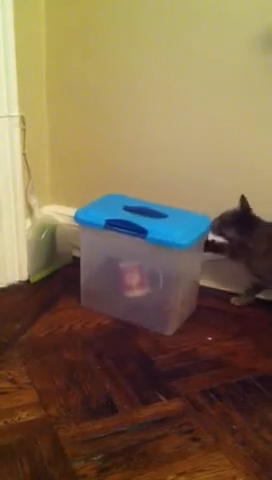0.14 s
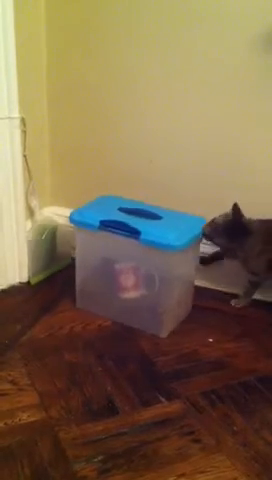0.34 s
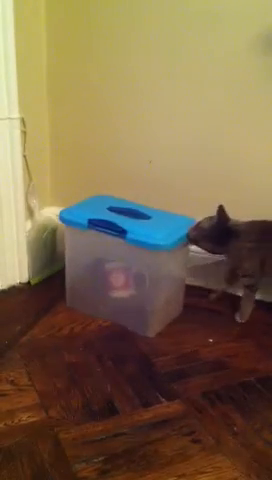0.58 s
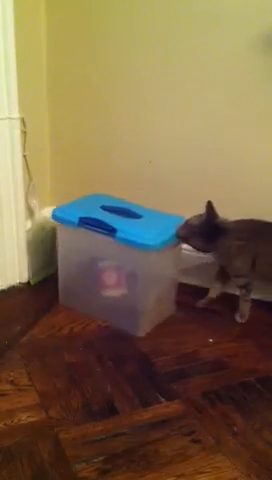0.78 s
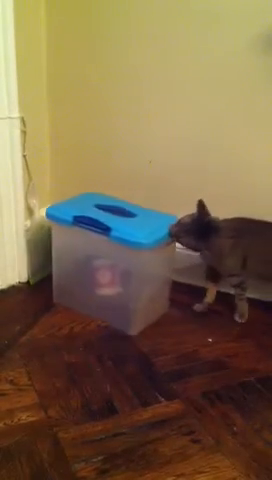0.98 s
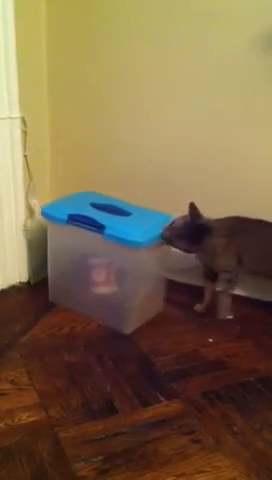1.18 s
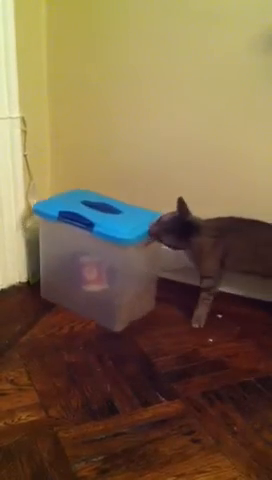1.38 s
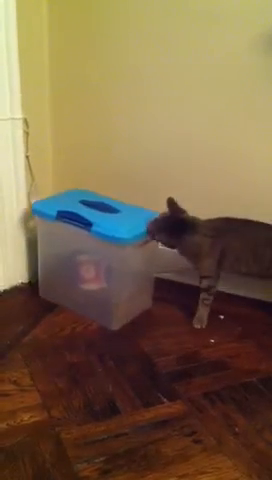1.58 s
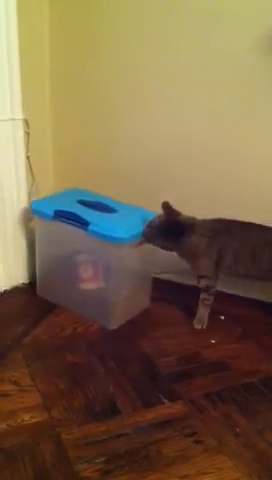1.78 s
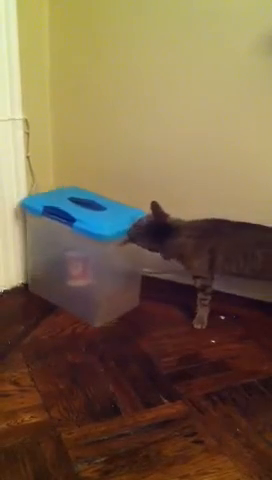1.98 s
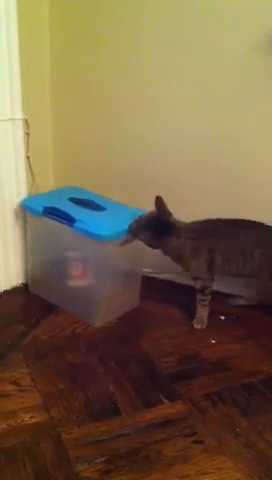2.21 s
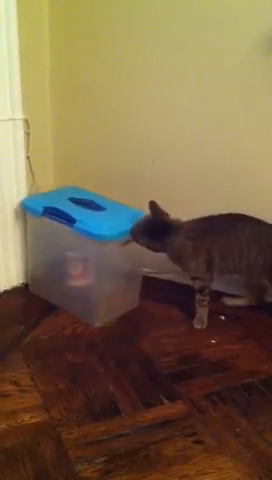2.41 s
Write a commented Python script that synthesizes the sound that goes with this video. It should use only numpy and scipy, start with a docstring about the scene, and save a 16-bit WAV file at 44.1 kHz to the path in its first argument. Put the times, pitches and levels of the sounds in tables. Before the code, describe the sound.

A hollow plastic box knocks and scrapes along a wooden floor in a bare room.

```python
"""A cat shoves a hollow plastic storage box over a wooden floor, a couple of metres from a phone.
First the walls groan as the base catches, then at 0.2 s hard knocks make them ring and crack.
The box judders and scrapes along, gets a soft nudge at 1.25 s and is knocked again near 2.1 s,
ending in a few last groans. All along, the bare room prolongs every blow, and a faint swish
comes and goes over the quiet room tone."""
import sys
import numpy as np
from scipy import signal
from scipy.fft import rfft, irfft
from scipy.io import wavfile
from scipy.ndimage import uniform_filter1d

SR = 44100
rng = np.random.default_rng(int(sys.argv[2]) if len(sys.argv) > 2 else 0)


def to_wav(s):
    """Save 16-bit WAV."""
    ch = np.atleast_2d(s).T  # columns
    pcm = np.round(np.clip(ch, -1, 1) * 32767)  # PCM
    wavfile.write(sys.argv[1], SR, pcm.astype(np.int16))


N = 108045


def gain(db):
    """Turn decibels into a number to multiply a sound by."""
    return 10 ** (np.asarray(db) / 20)


def normalise(x):
    """Scale a sound to an average (rms) level of 1."""
    return x / np.sqrt(np.mean(x ** 2))


def level_curve(table, column):
    """Join a table's dB levels with straight lines in time; give one gain per sample."""
    rows = np.array(table)
    return gain(np.interp(np.arange(N) / SR, rows[:, 0], rows[:, column]))


def colour(x, points):
    """Shape a sound's spectrum by (Hz, dB) points, fading below the first; rms level 1."""
    hz, db = np.array(points).T
    octave = np.log2(np.arange(len(x) // 2 + 1) * SR / len(x) + 1)
    octaves_below = np.maximum(np.log2(hz[0]) - octave, 0)
    shape_db = np.interp(octave, np.log2(hz), db) - 11 * octaves_below
    return normalise(irfft(rfft(x) * gain(shape_db), len(x)))


# The colour of the quiet room. Each row: frequency in Hz, relative level in dB.
ROOM_TONE_COLOUR = [(53, -37), (90, -2.5), (277, 1), (344, -4.5), (486, -22), (733, -16), (1340, -17),
                    (1560, -24), (15800, -31.5)]


def room_tone():
    """A steady, low noise lies under everything."""
    return gain(-58) * colour(rng.standard_normal(N), ROOM_TONE_COLOUR)


# How the swish comes and goes. Each row: time in seconds, level in dB.
SWISH_LEVELS = [(0, -98), (.12, -70.5), (.18, -63.5), (.2, -94), (.53, -72.5), (.6, -63.5), (.64, -59),
                (.68, -65), (.95, -82), (1.3, -88), (1.34, -66.5), (1.47, -71), (1.51, -63.5), (1.58, -70),
                (1.83, -81), (1.9, -72), (2.08, -67.5), (2.12, -64), (2.16, -56), (2.21, -73), (2.33, -90),
                (2.37, -68), (2.45, -88)]
# The colour of the swish. Each row: frequency in Hz, relative level in dB.
SWISH_SPECTRUM = [(1500, -16), (3000, -1), (5000, -6), (8000, -4.5), (11000, -8.5), (15500, -13)]


def swish():
    """A faint, high hiss swells and fades."""
    return level_curve(SWISH_LEVELS, 1) * colour(rng.standard_normal(N), SWISH_SPECTRUM)


# The room's echo. Each row: middle of a band in Hz, seconds to fade by 60 dB, relative level in dB.
ECHO_BANDS = [(135, 0.25, -10.5), (268, 0.43, -7.5), (526, 0.58, 0), (940, 0.55, -1), (2070, 0.69, -6.5),
              (4160, 0.49, -0.5), (8000, 0.42, 1), (14500, 0.23, 2)]
ECHO_DB, ECHO_RISE_MS = -2.5, 6.54


def room_echo(x):
    """The bare room throws a sound back as dense echoes that die away band by band."""
    t = np.arange(SR) / SR
    tail = 0
    for hz, fade_s, db in ECHO_BANDS:
        band = signal.butter(2, [hz / 2 ** .5, min(hz * 2 ** .5, 20000)], "band", fs=SR, output="sos")
        tail = tail + signal.sosfilt(band, rng.standard_normal(SR)) * gain(db - 60 * t / fade_s)
    # Even out the spectrum so that no narrow stretch of pitch sticks out.
    power = np.abs(rfft(tail)) ** 2 + 1e-12
    evening = np.sqrt(uniform_filter1d(power, size=400) / uniform_filter1d(power, size=50))
    rise = np.clip(t * 1000 / ECHO_RISE_MS, 0, 1) ** 2
    tail = irfft(rfft(tail) * evening) * rise * (t < .9)
    tail /= np.sqrt(np.sum(tail ** 2))
    return gain(ECHO_DB) * signal.fftconvolve(x, tail)[:N]


# The box's own notes. Each row: pitch in Hz, relative level in dB, seconds to fade by 60 dB.
WALL_NOTES = [(121.5, -3, 0.21), (139.66, -1, 0.4), (179.4, 1, 0.21), (213.3, 0.5, 0.21),
              (245.5, 6.5, 0.13), (285, 1.5, 0.2), (325.7, -4.5, 0.1), (382.5, -9, 0.22), (460, -5, 0.094),
              (634, -16.5, 0.14), (694, -15, 0.18), (1120, -30, 0.036), (2200, -28, 0.018)]


def wall_ring(boost_db):
    """One tap sets all the notes of the walls ringing, each with its own boost."""
    t = np.arange(SR // 2) / SR
    hz, db, fade_s = np.array(WALL_NOTES).T[:, :, None]
    direction = (-1.) ** np.arange(len(WALL_NOTES))[:, None]  # neighbouring notes swing opposite ways
    fade = gain(db + boost_db[:, None] - 60 * t / fade_s)
    return np.sum(direction * fade * np.sin(2 * np.pi * hz * t), axis=0)


# The base sliding over the boards. Each row: time in seconds, rumble level in dB, rasp level in dB.
DRAG_LEVELS = [(0, -63, -68), (.03, -54, -54), (.09, -57, -68), (.17, -60, -56.5), (.2, -34.5, -63),
               (.5, -65.5, -64.5), (.63, -58.5, -58), (.76, -53, -60), (.99, -60, -65.5),
               (1.22, -63, -66.5), (1.27, -42.5, -61.5), (1.34, -61, -61), (1.58, -49.5, -58.5),
               (1.67, -43.5, -60.5), (1.76, -62.5, -63.5), (1.84, -72, -69.5), (1.9, -54.5, -58.5),
               (2.04, -44.5, -55), (2.09, -49, -50.5), (2.13, -37.5, -43.5), (2.45, -66.5, -70.5)]
# The colour of the rasp. Each row: frequency in Hz, relative level in dB.
RASP_COLOUR = [(210, -13), (350, -1), (631, 0.5), (998, -10.5), (2310, -12), (2700, -16.5), (4990, -21.5),
               (8000, -30), (10400, -38), (17600, -120)]
SLIPS_PER_S, SLIP_SPREAD_DB = 2100, 3


def drag():
    """The base sticks and slips in tiny, uneven jerks that shake the walls and rasp on the boards."""
    slipping = rng.random(N) < SLIPS_PER_S / SR
    direction = np.sign(rng.random(N) - .5)
    slips = slipping * direction * gain(SLIP_SPREAD_DB * rng.standard_normal(N))
    ring = wall_ring(boost_db=np.zeros(len(WALL_NOTES)))
    rumble = normalise(signal.fftconvolve(slips, ring)[:N])
    roughness = normalise(uniform_filter1d(np.abs(slips), size=120))  # high where slips crowd together
    rasp = colour(rng.standard_normal(N) * (1.1 + roughness), RASP_COLOUR)
    return level_curve(DRAG_LEVELS, 1) * rumble + level_curve(DRAG_LEVELS, 2) * rasp


# Short groans. Each row: start in seconds, length in seconds, peak level in dB, middle pitch in Hz.
WALL_GROANS = [(0.008, 0.044, -36, 248), (0.052, 0.071, -40.5, 232), (0.125, 0.065, -50, 222),
               (0.4, 0.073, -36.5, 197.7), (0.56, .055, -45, 239.5), (0.735, 0.03, -46, 175),
               (1.092, 0.053, -42.5, 236), (1.138, 0.054, -42, 236), (1.275, 0.069, -48, 234),
               (1.335, 0.053, -42.5, 245), (1.36, 0.034, -39.5, 172), (1.39, 0.045, -42.5, 225),
               (1.447, 0.028, -38.5, 254), (1.555, 0.042, -43, 225), (1.61, 0.057, -52.5, 228.5),
               (1.855, 0.025, -48.5, 175), (2.17, 0.055, -40, 249), (2.2, 0.071, -44, 247),
               (2.28, 0.057, -43.5, 234)]
GROAN_SAG, GROAN_OVERTONE_DB = 0.12, -22.5  # the sag is the share of pitch lost over a groan


def groans():
    """The base catches and a wall judders: a note that swells, fades and sinks a little."""
    out = np.zeros(N + SR)
    for start_s, length_s, db, hz in WALL_GROANS:
        start = int(start_s * SR)
        progress = np.linspace(0, 1, int(length_s * SR))
        pitch = hz * (1 + GROAN_SAG * (.5 - progress))
        phase = 2 * np.pi * np.cumsum(pitch) / SR
        swell = np.sin(np.pi * progress ** 0.43) ** 2
        note = np.sin(phase) + gain(GROAN_OVERTONE_DB) * np.sin(2 * phase)
        out[start:start + len(note)] += gain(db) * swell * note
    return out[:N]


# Blows on the box. Each row: start in seconds, relative level in dB, favoured pitch in Hz,
# dB added to that level for the crack, contact time in milliseconds, top of the crack in Hz.
BLOWS = [(0.174, -47, 236, -10, 1.2, 1510), (0.184, -37.5, 236, -8, 1.3, 2540),
         (0.199, -16.5, 206, -8, 1, 11700), (0.207, -18, 150, -21, 3.1, 9100),
         (0.218, -11, 231, -25, 1.8, 4000), (0.228, -14.5, 288, -17.5, 2.2, 3160),
         (0.255, -11.5, 237, -20.5, 5.6, 2980), (0.27, -21.5, 205, -12, 0.83, 3880),
         (1.243, -29, 209, -18.5, 0.67, 1140), (1.255, -35.5, 178, -38, 2.7, 900),
         (1.889, -51, 282, -9, 1.7, 2500), (2.101, -34, 410, -2, 0.49, 9300),
         (2.106, -29, 181, -22.5, 1.8, 9150), (2.112, -27, 296, -9, 1.3, 12100),
         (2.138, -24, 290, -17.5, 1.15, 6000)]
# The colour of the crack. Each row: frequency in Hz, relative level in dB.
CRACK_COLOUR = [(300, 4.5), (600, -8), (800, -8), (1100, -7.5), (1600, -9.5), (2300, -7), (3200, -18.5),
                (4400, -20.5), (8000, -30), (15500, -32)]
RING_DB, FAVOUR_DB, FAVOUR_OCTAVES = -4.5, 6, .25  # notes near the favoured pitch ring louder
CRACK_MS, RATTLE_MS, RATTLE_DB = 5, 22, -5.5  # the loose lid chatters on after the crack


def knocks():
    """Each blow pushes the walls briefly and makes them ring; it starts with a crack and a rattle."""
    out = np.zeros(N + SR)
    note_hz = np.array(WALL_NOTES)[:, 0]
    noise = colour(rng.standard_normal(N + SR), CRACK_COLOUR)
    ms = np.arange(SR // 5) * 1000 / SR
    fade = np.exp(-ms / CRACK_MS) + gain(RATTLE_DB) * np.exp(-ms / RATTLE_MS)
    for start_s, db, pitch_hz, crack_db, contact_ms, top_hz in BLOWS:
        start = int(start_s * SR)
        octaves_away = np.log2(note_hz / pitch_hz)
        ring = wall_ring(FAVOUR_DB * np.exp(-(octaves_away / FAVOUR_OCTAVES) ** 2))
        push = np.hanning(int(contact_ms * SR / 1000) + 3)  # a longer push sounds duller
        thud = signal.fftconvolve(ring / np.abs(ring).max(), push / push.sum())
        out[start:start + len(thud)] += gain(db + RING_DB) * thud
        treble_cut = signal.butter(2, top_hz, fs=SR, output="sos")
        crack = signal.sosfilt(treble_cut, fade * noise[start:start + len(fade)])
        out[start:start + len(crack)] += gain(db + crack_db) * crack
    return out[:N]


def scene():
    """Add up the layers in one channel; the knocks echo fully, the groans more weakly."""
    background = swish() + room_tone()
    blows, judder = knocks(), groans()
    echo = room_echo(blows + gain(-9) * judder)
    return (background + echo + drag() + judder + blows)[None]


def record(dry):
    """The phone loses the deep bass and the highest treble."""
    bass_cut = signal.butter(4, 110, "high", fs=SR, output="sos")
    treble_cut = signal.ellip(10, .2, 70, 15800, fs=SR, output="sos")
    return signal.sosfilt(treble_cut, signal.sosfilt(bass_cut, dry))


dry = scene()
out = record(dry)
to_wav(out)
```